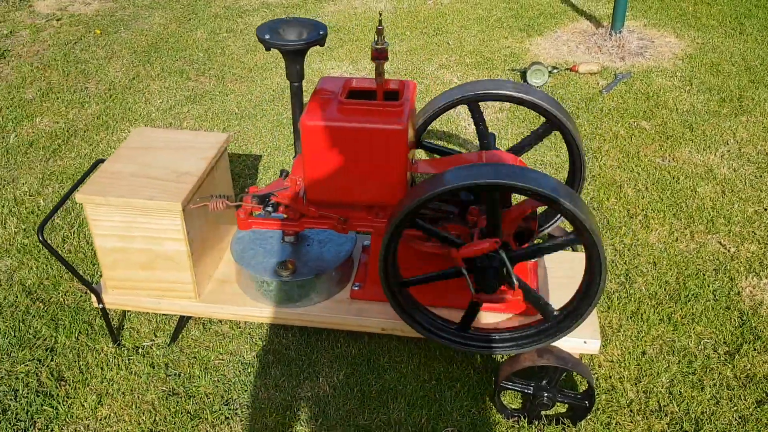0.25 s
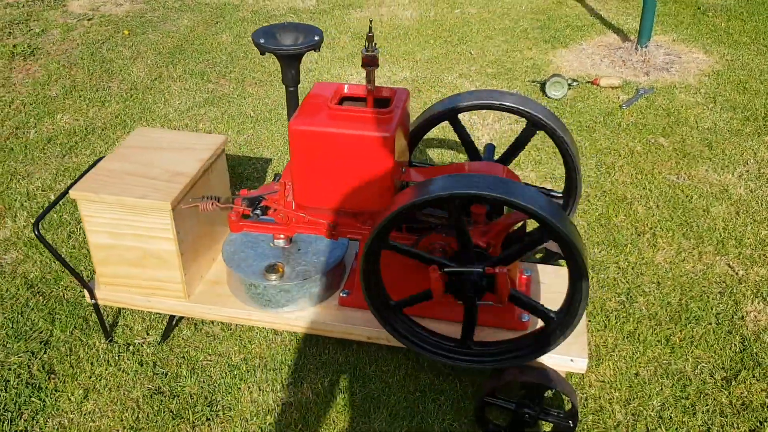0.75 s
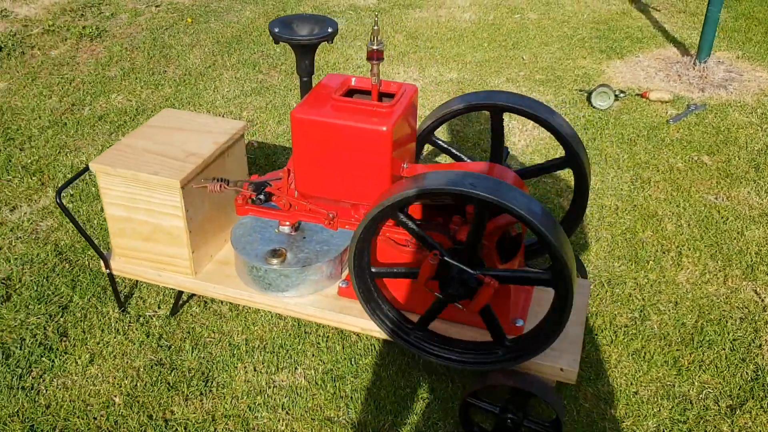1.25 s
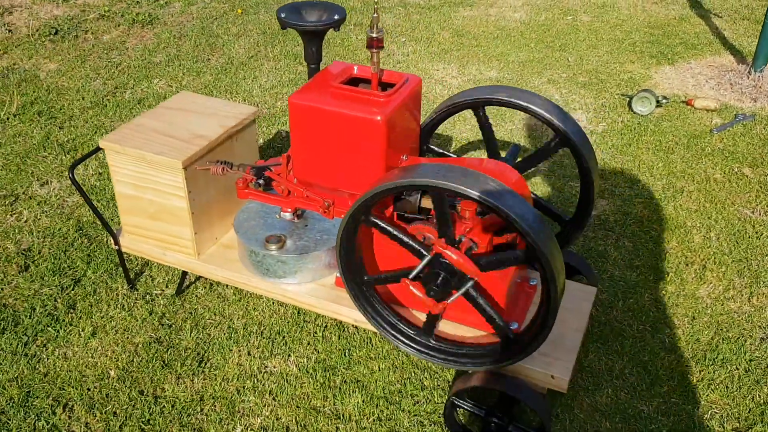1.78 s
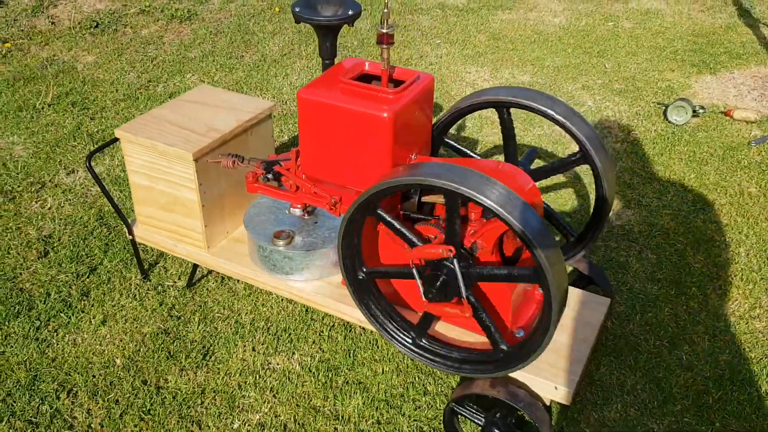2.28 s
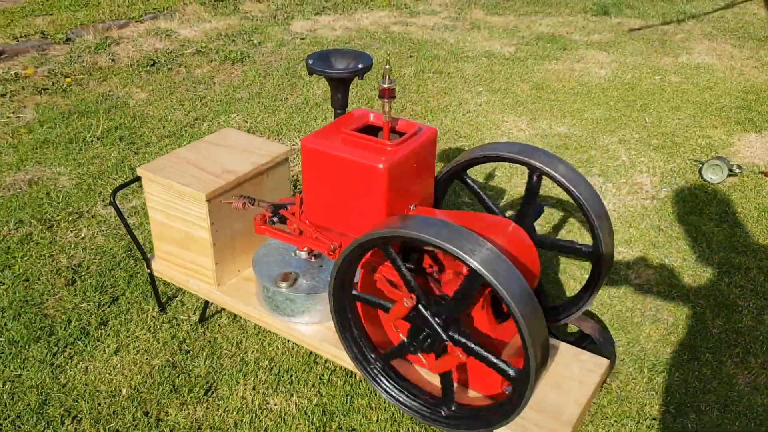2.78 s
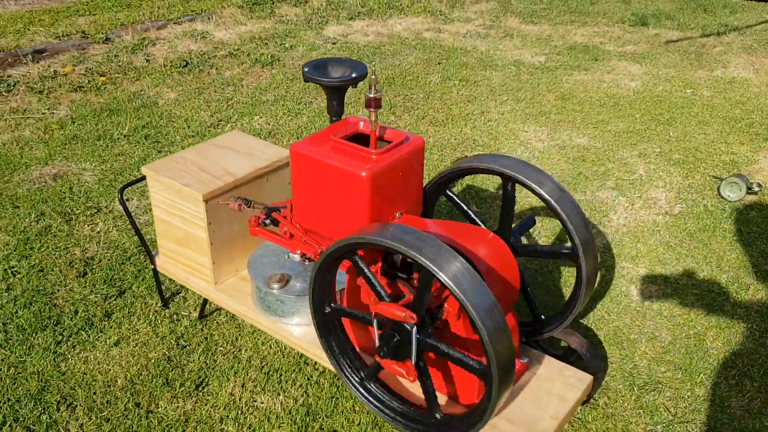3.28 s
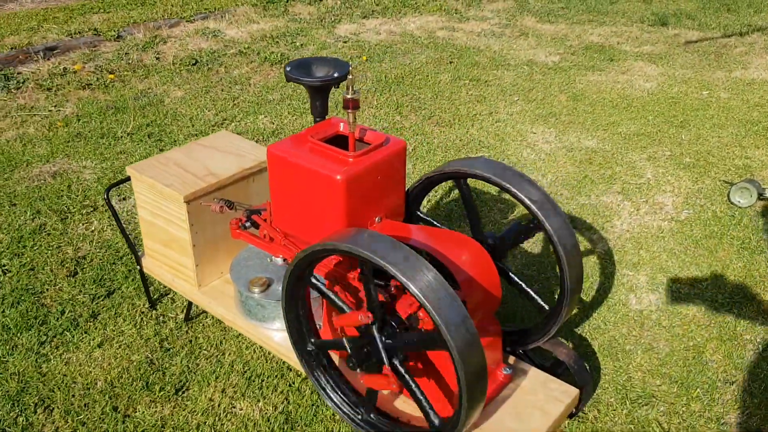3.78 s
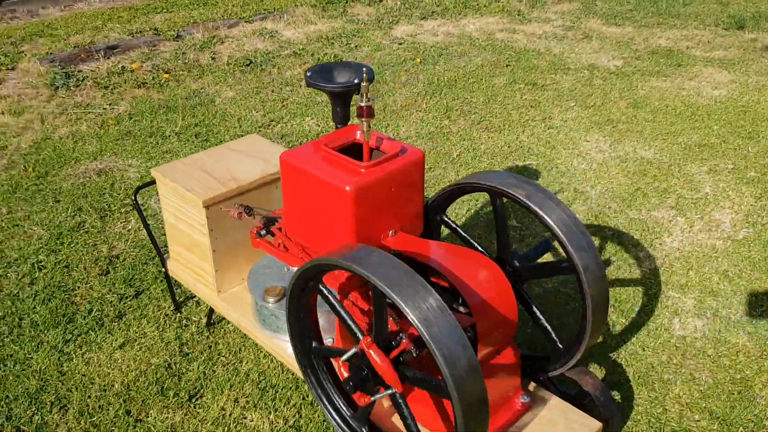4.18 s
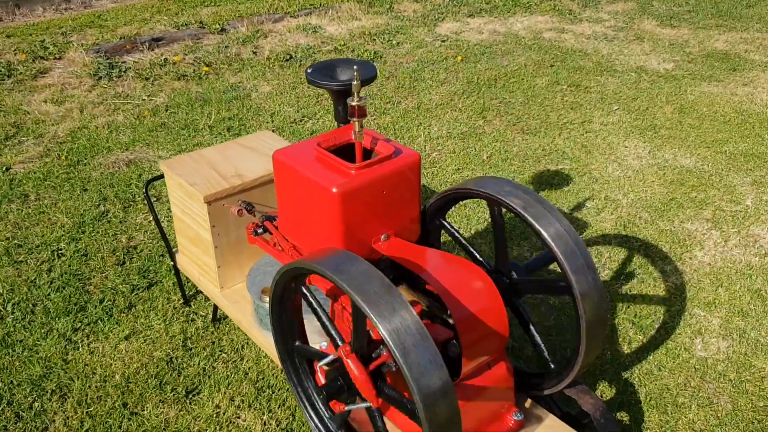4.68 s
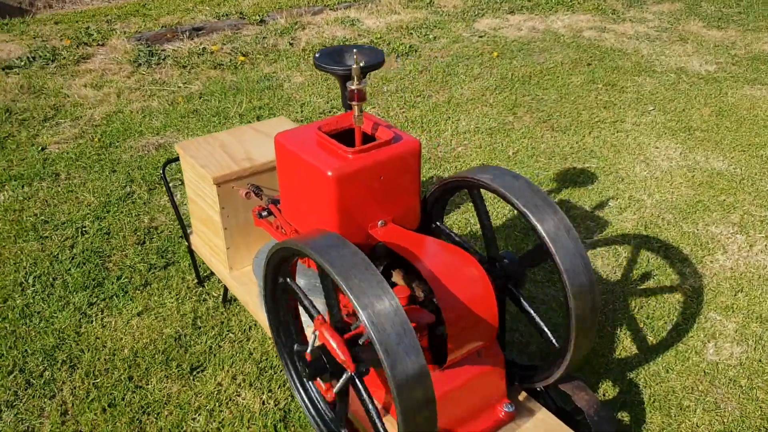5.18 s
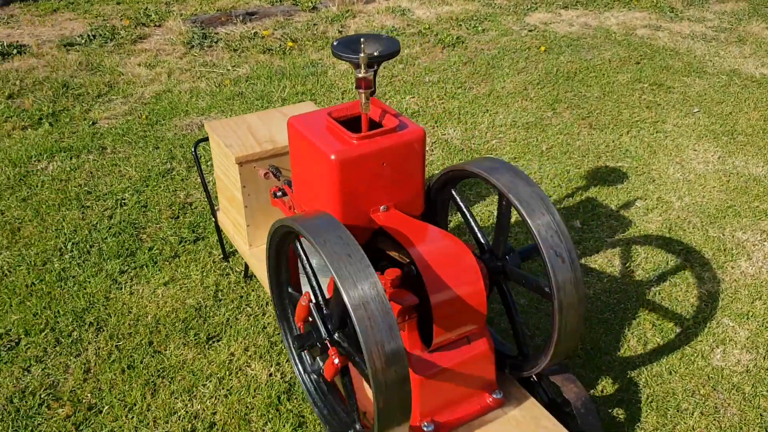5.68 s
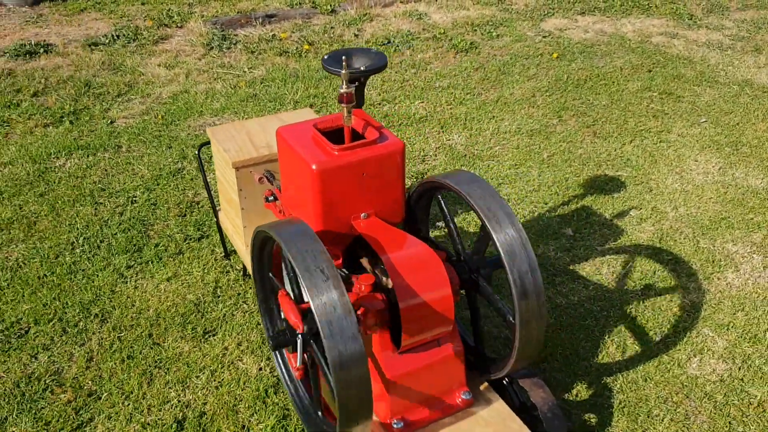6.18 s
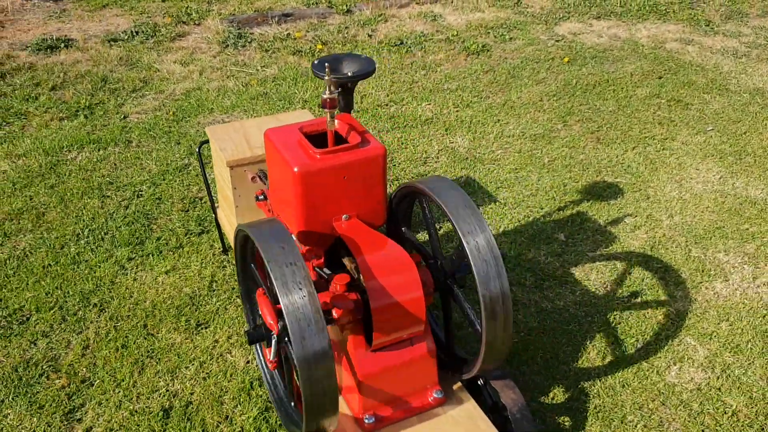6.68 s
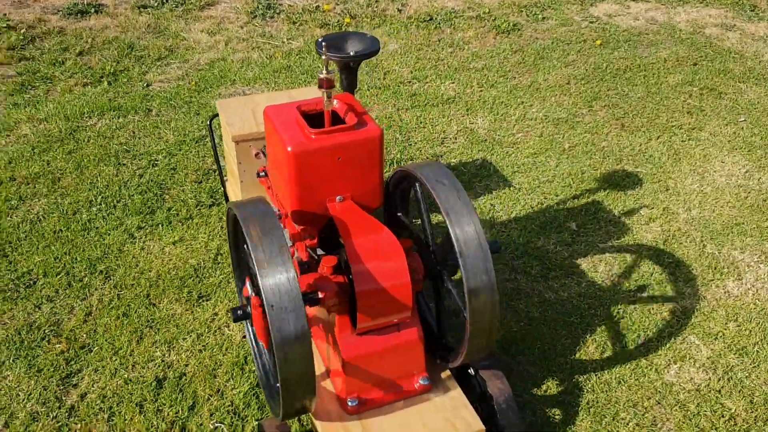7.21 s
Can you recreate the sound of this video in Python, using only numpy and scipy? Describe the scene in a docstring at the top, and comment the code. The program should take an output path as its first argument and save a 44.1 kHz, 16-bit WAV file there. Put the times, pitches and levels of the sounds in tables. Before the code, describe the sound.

A small old single-cylinder engine with heavy flywheels runs on a wooden cart on a lawn, heard a step away in dry open-air stereo for about 7.4 seconds. It is already turning. Nearly three times a second the mechanism repeats an uneven pattern: a light lift tick, a bright iron clank, dull knocks through frame and boards, a short swelling valve hiss cut off, and a latch click with loose chatter. At about 1.3, 2.7, 4.4 and 6.1 seconds it fires: a thin clank, a blunt crack, then within hundredths of a second a much louder metallic clank and a rough exhaust puff dying quickly. The crack at 4.4 is strongest. Between firings it coasts, clattering. Faint grainy gear rumble and thin whirr lie underneath, swelling around each firing. Soft low air pushes and slight wind bumps appear, most around 6.1 and 7.2. The clatter continues to the end.

```python
"""Knocks, clanks, ticks and puffs of a small single-cylinder engine on a wooden cart on a lawn, a step away.
Cam, push rod, latch and valve ring the iron and boards (decaying modes, noise bursts); the piston pumps
air through the open valve (swelling hiss). Every few turns a charge fires: crack, clank, exhaust blast.
Gears and bearings rumble and whirr beneath; some wind brushes the microphone (low noise)."""
import sys
import numpy as np
from scipy import signal
from scipy.fft import rfft, irfft, next_fast_len
from scipy.io import wavfile
from scipy.ndimage import map_coordinates

SR = 44100
rng = np.random.default_rng(int(sys.argv[2]) if len(sys.argv) > 2 else 0)


def inscribe(sig):
    """Save sig as 16-bit PCM at rate SR to the path in sys.argv[1].

    A 1-D sig is mono; a 2-D sig holds one channel per row.
    Samples are clipped to [-1, 1] before scaling.
    """
    pcm = np.round(np.clip(np.atleast_2d(sig).T, -1, 1) * 32767)
    wavfile.write(sys.argv[1], SR, pcm.astype(np.int16))


N = 328533

# colour of valve air and whirr: f/Hz, relative density level/dB
AIR_COLOUR = [(880, -49), (1500, -36), (1980, -38), (2150, -53), (2650, -54), (2930, -4.5), (3960, -0.5),
              (4880, -6.5), (6860, 1.5), (8800, -10.5), (12900, 1), (15900, -5.5), (16400, -6.5)]
# colour of gear rumble and board rattle: f/Hz, relative density level/dB
RUMBLE_COLOUR = [(71, -67), (120, -19), (399, -4), (520, 1.5), (711, -5.5), (844, 0), (1000, -1.5),
                 (1370, -5.5), (1840, -12), (2290, -8.5), (2520, -11), (3330, -16), (5000, -19),
                 (6500, -24), (11000, -120)]
# colour of air pushes and wind: f/Hz, relative density level/dB
THUMP_COLOUR = [(12, -51), (20, -26), (70, -3.5), (155, -5), (197, -19.5), (280, -3), (300, -1), (390, -20),
                (660, -120)]
# turns of the cam: lift t/s, clank t/s, second knock t/s; relative level/dB of each part, lift to push
# as in PARTS; favoured f/Hz of the clanks, of the knocks
TURNS = [(-.018, 0.045, .172, -30, -17, -14, -19.5, -26.5, -26, -23.5, -30, -39.5, -56, 2200, 765),
         (.324, .385, .520, -21.5, -26.5, -16.5, -21, -28.5, -25.5, -23, -29, -39.5, -56, 2020, 1060),
         (.678, 0.7423, .8862, -22.5, -28, -16.5, -21.5, -24, -20, -19, -22, -31.5, -56, 2040, 807),
         (1.053, 1.12, 1.275, -15.5, -17.5, -10, -13, -15.5, -14.5, -16, -70, -25.5, -48, 2040, 770),
         (1.422, 1.481, 1.600, -15.5, -23, -12, -22, -26.5, -24.5, -23.5, -26.5, -36.5, -53, 2780, 700),
         (1.748, 1.808, 1.935, -21, -33, -18.5, -24, -28, -25.5, -25, -29.5, -37, -56, 2080, 534),
         (2.086, 2.148, 2.285, -22.5, -32, -19, -26, -28, -25, -24.5, -33, -35.5, -61, 2900, 794),
         (2.446, 2.510, 2.657, -29, -37, -14.5, -23, -23.5, -22, -17.5, -70, -28, -55, 1910, 900),
         (2.791, 2.856, 2.965, -19, -16.5, -13, -20, -29, -24, -24, -26.5, -37, -50, 2050, 810),
         (3.105, 3.168, 3.285, -20.5, -27, -18, -26.5, -30.5, -27.5, -23.5, -27.5, -34, -59, 3060, 553),
         (3.432, 3.494, 3.620, -21, -35, -22, -25, -28, -28, -24, -30.5, -35.5, -57, 2080, 520),
         (3.773, 3.836, 3.972, -23.5, -24, -22, -23, -31, -24, -19.5, -23.5, -29, -57, 1900, 655),
         (4.135, 4.198, 4.344, -14.5, -23, -6, -11.5, -16, -19, -15, -70, -20.5, -49, 2210, 526),
         (4.488, 4.548, 4.664, -19, -15.5, -11, -14.5, -27, -21, -22, -26.5, -29.5, -49, 2340, 850),
         (4.809, 4.868, 4.993, -19.5, -20, -23.5, -21.5, -24.5, -25, -22, -28.5, -33, -58, 2240, 520),
         (5.145, 5.21, 5.339, -21, -22, -17.5, -22, -26, -23.5, -22, -29.5, -35, -53, 2260, 848),
         (5.499, 5.565, 5.705, -22.5, -24.5, -16, -16.5, -25, -20.5, -17.5, -23.5, -30, -55, 2240, 850),
         (5.872, 5.938, 6.092, -14.5, -24, -14.5, -14, -16, -17.5, -13.5, -70, -23.5, -51, 2430, 844),
         (6.240, 6.299, 6.421, -19.5, -20.5, -14, -13.5, -22.5, -24.5, -19.5, -26.5, -32, -48, 2327, 920),
         (6.565, 6.628, 6.755, -20, -25, -17, -19.5, -23, -24, -21, -26.5, -34, -51, 2320, 790),
         (6.91, 6.973, 7.111, -22.5, -38, -18.5, -20.5, -27, -24, -20, -30, -33.5, -48, 2250, 830),
         (7.267, 7.337, 7.486, -22, -29, -20.5, -23, -21, -21.5, -25, -70, -24, -59, 2500, 830)]
PARTS = "lift rod clank spit rebound first second trip stroke push clank_hz knock_hz".split()
# cam position of each part: part, turns after the clank
PLACES = dict(lift=-.18, rod=-.09, clank=0, spit=0, push=0, rebound=.057, first=.2, stroke=.342, second=.37, trip=.57)
# fired charges: crack t/s, clank t/s; relative level/dB of crack, clank, blast, push, shaking
FIRINGS = [(1.31, 1.341, -14.5, -3, -13, -46, -25.5), (2.688, 2.7177, -14, -6, -12.5, -44, -33.5),
           (4.379, 4.4093, -10.5, -2.5, -12, -42, -25), (6.129, 6.162, -13.5, -2.5, -12, -43, -25)]
# exhaust puffs: t/s after the clank, level/dB re blast, rise/s, hold/s, t60/s
PUFFS = [(0.018, -0.9, .0045, 0.015, 0.066), (0.041, -12, 0.0026, 0.0055, 0.21)]


def amp(db):
    """dB to gain."""
    return 10 ** (np.asarray(db) / 20)


def rms_one(x):
    """Scale to rms 1."""
    return x / np.sqrt(np.mean(x ** 2) + 1e-20)


def in_time(rows):
    """Interpolate each column of a curve, first column t/s, to every sample."""
    s, *columns = np.transpose(rows)
    return [np.interp(np.arange(N) / SR, s, column) for column in columns]


def drift(rate_hz):
    """Random wander, rms 1: white noise at SR/40 through a two-pole low-pass."""
    step, settle = 40, 2000
    r = np.exp(-2 * np.pi * rate_hz * step / SR)
    white = rng.standard_normal(N // step + settle + 2)
    slow = signal.lfilter([1], [1, -2 * r, r * r], white)[settle:]
    return np.interp(np.arange(N) / step, np.arange(len(slow)), rms_one(slow))


def noise(colour, channels=1):
    """Gaussian noise shaped by a spectrum, dB linear in log f; rms 1 over all channels."""
    size = next_fast_len(N)
    hz = np.maximum(np.arange(size // 2 + 1) * SR / size, 1)
    colour_hz, colour_db = np.array(colour).T
    gain = amp(np.interp(np.log(hz), np.log(colour_hz), colour_db))
    white = rng.standard_normal((channels, size))
    return rms_one(irfft(rfft(white) * gain, size)[:, :N])


def highpass(x, order, hz):
    """Butterworth high-pass."""
    return signal.sosfilt(signal.butter(order, hz, "high", fs=SR, output="sos"), x)


def add(out, s, piece):
    """Mix a piece in at time s, no earlier than 0."""
    i = max(round(s * SR), 0)
    out[i:i + len(piece)] += piece[:max(N - i, 0)]


def bell(t, centre_s, sigma_s):
    """Gaussian swell."""
    return np.exp(-.5 * ((t - centre_s) / sigma_s) ** 2)


def cam():
    """Known cam positions in turns, and their times in s."""
    known = [PLACES[part] for part in ("lift", "clank", "second")]
    turn = np.add.outer(np.arange(len(TURNS)), known)
    return turn.ravel(), np.array(TURNS)[:, :3].ravel()


def every_turn(part, late_s=0):
    """Rows (t/s, part level/dB, clank f/Hz, knock f/Hz), one per turn, t > 0 only."""
    column = dict(zip(PARTS, np.array(TURNS).T[3:]))
    s = np.interp(np.arange(len(TURNS)) + PLACES[part], *cam()) + late_s
    rows = zip(s, column[part], column["clank_hz"], column["knock_hz"])
    return [row for row in rows if row[0] > 0]


def struck(modes, favoured_hz, contact_s, chance, t):
    """One blow: decaying modes of random strength, tuning and phase, favoured near one pitch; peak 1."""
    hz, db, t60 = np.array(modes).T[:, :, None]
    near_db = -6 * np.abs(np.log2(hz / favoured_hz))  # 6 dB/octave away from the favoured pitch
    own_db, own_hz, own_turn = 2.5 * chance[0], hz * (1 + 0.011 * chance[1]), .2 * chance[2]
    sines = np.sin(2 * np.pi * (own_hz * t + own_turn))
    blow = np.sum(amp(db + near_db + own_db - 60 * t / t60) * sines, axis=0)
    blow *= 1 - np.exp(-(t / contact_s) ** 2)  # builds up over the contact
    return blow / np.abs(blow).max()


def wind():
    """Gusts: low noise, independent in each channel, under one shared flickering level."""
    # gust curve: t/s, relative level/dB
    gusts = [(0.0, -73), (0.62, -80), (0.91, -64), (2.09, -75), (2.66, -70), (3.09, -74), (4.13, -69),
             (4.38, -56), (4.62, -60), (4.95, -64), (5.35, -70), (5.79, -66), (6.1, -47.5), (6.27, -47.5),
             (6.91, -61), (7.16, -46), (7.45, -63)]
    level = amp(in_time(gusts)[0] + 2.5 + 2.7 * drift(4.5))
    return level * noise(THUMP_COLOUR, channels=2)


def shaken(steady_db, swell_db, after_s, over_db, rise_db_per_s, fall_db_per_s):
    """Gain with one swell per turn, power-summed with a rise to and fall from each firing."""
    beat_turn = -0.12  # swell tops here
    t, (turn, s) = np.arange(N) / SR, cam()
    beat = np.cos(2 * np.pi * (np.interp(t, s, turn) - beat_turn))
    gain = amp(steady_db + swell_db * beat)
    for _, clank_s, *_, shake_db in FIRINGS:
        late_s = t - clank_s - after_s
        ramp_db = np.minimum(rise_db_per_s * late_s, -fall_db_per_s * late_s)
        gain = np.hypot(gain, amp(shake_db + over_db + ramp_db))
    return gain


def running():
    """Gear teeth tap the body many times a second over bearing noise, with a thin whirr above."""
    # gears and bearings: t/s, relative rumble level/dB, relative whirr level/dB
    running_levels = [(0.0, -35, -43), (.5, -40, -50.5), (2.3, -38.5, -50.5), (3.7, -40, -47.5),
                      (4.8, -36, -47), (5.5, -40, -46.5), (6.7, -35.5, -48.5), (7.45, -38.5, -43)]
    rumble_db, whirr_db = in_time(running_levels)
    taps = (rng.random(N) < 450 / SR) * amp(1.2 * rng.standard_normal(N))  # mean 450 taps/s
    tap_decay_s = 0.0036
    grain = rms_one(signal.lfilter([1], [1, -np.exp(-1 / (tap_decay_s * SR))], taps))
    rumble_gain = shaken(rumble_db, swell_db=3.5, after_s=0, over_db=-0.5,
                         rise_db_per_s=24.5, fall_db_per_s=65)
    whirr_gain = shaken(whirr_db, swell_db=1.7, after_s=0.06, over_db=0,
                        rise_db_per_s=55, fall_db_per_s=145)
    rumble = rumble_gain * amp(-9 + 1.5 * drift(25)) * (.6 + grain) * noise(RUMBLE_COLOUR)[0]
    whirr = whirr_gain * amp(-4 + 3.0 * drift(54)) * noise(AIR_COLOUR)[0]
    return rumble + whirr


def pushes():
    """Each piston stroke and first exhaust puff moves a soft lump of air, uneven between channels."""
    level, t = np.zeros(N), np.arange(N) / SR
    times = [(s, db) for s, db, *_ in every_turn("push")]
    times += [(clank_s + PUFFS[0][0], db) for _, clank_s, *_, db, _ in FIRINGS]
    for s, db in times:
        level += amp(db) * bell(t, s, 0.043)
    return level * (noise(THUMP_COLOUR) + 0.35 * noise(THUMP_COLOUR, channels=2))


def strokes():
    """Valve hiss swells while the piston speeds up and is cut as the stroke ends."""
    rise_s, fall_s = 0.016, 0.01  # Gaussian sigmas
    level, t = np.zeros(N), np.arange(N) / SR
    for s, db, *_ in every_turn("stroke"):
        level += amp(db) * bell(t, s, np.where(t < s, rise_s, fall_s))
    return level * amp(1.5 * drift(80)) * noise(AIR_COLOUR)[0]


def tick_times():
    """Rows (t/s, relative level/dB, t60/s): parts of every turn, and a spit after each crack."""
    # ticks and spits: part, delay/s, level/dB re part, t60/s
    tick_places = [("lift", .006, 0.1, 0.2), ("rod", .001, -7, 0.12), ("spit", -0.00084, 0.1, 0.1),
                   ("rebound", 0.00044, -3.5, 0.058), ("rebound", 0.0239, -4, 0.027),
                   ("trip", -0.0344, -3.5, 0.051), ("trip", 0.00084, -0.65, .1), ("trip", .015, 0.1, 0.076)]
    rows = []
    for part, late_s, over_db, t60 in tick_places:
        rows += [(s, db + over_db, t60) for s, db, *_ in every_turn(part, late_s)]
    return rows + [(crack_s + 0.018, db + 0.8, .1) for crack_s, _, db, *_ in FIRINGS]


def ticks():
    """Bright noise spits with a rounded top and a fainter decaying tail, grainy within."""
    # tick colour: f/Hz, relative density level/dB
    tick_colour = [(1760, -9.5), (3000, 2), (3870, -5), (5220, -1.5), (5850, -5), (7080, -2.5), (8280, -26),
                   (9270, -6.5), (12900, -6.5), (15700, -10), (16400, -6)]
    level, t = np.zeros(N), np.arange(SR // 4) / SR
    spit = bell(t, .005, 0.0015)
    for s, db, t60 in tick_times():
        tail = amp(-60 * t / t60) * (1 - np.exp(-(t / 0.0045) ** 2))
        add(level, s - .002, amp(db - 10) * (spit + tail))
    return level * amp(3.6 * drift(225)) * noise(tick_colour)[0]


def clank_times():
    """Rows (t/s, relative level/dB, favoured f/Hz, clatter t60/s): parts of every turn, and firings."""
    # clanks: part, delay/s, level/dB re part, pitch ratio to the turn's, clatter t60/s
    clank_places = [("lift", 0.001165, -5, 2, 0.14), ("rod", .0001, 0.1, 0.71, 0.073),
                    ("clank", .0002, 0.2, 0.8, 0.08), ("rebound", 0.022, -7, 1.9, .035),
                    ("second", 0.00103, -11, 1.2, 0.022), ("trip", 0.001014, 0.1, 1.17, .075)]
    rows = []
    for part, late_s, over_db, ratio, length_s in clank_places:
        rows += [(s, db + over_db, hz * ratio, length_s) for s, db, hz, _ in every_turn(part, late_s)]
    for crack_s, clank_s, _, db, *_ in FIRINGS:
        rows.append((crack_s - .039, db - 13.5, 3160, 0.058))  # thin clank ahead of the crack
        rows.append((clank_s, db, 2080, 0.058))
    return rows


def clanks():
    """Each contact rings rod and valve; loose parts chatter after it as dense taps on the same iron."""
    # rod and valve modes: f/Hz, relative level/dB, t60/s of the ring
    high_modes = [(1714, -13.5, 0.051), (1908, 0, 0.032), (2041, 0, 0.023), (2308, -6, 0.078),
                  (2377, -3, 0.074), (2834, -14.5, 0.14), (3012, -12.5, 0.067), (3300, 0.5, 0.028),
                  (3320, -5, 0.052), (3834, 15, 0.0074)]
    # clatter colour: f/Hz, relative density level/dB
    clatter_colour = [(710, -71), (1200, -4.5), (1510, 4.5), (1840, 4.5), (2310, 9), (2550, 4), (3010, -1),
                      (3450, -29), (5000, -76), (6500, -52), (11000, -120)]
    ring, clatter, t = np.zeros(N), np.zeros(N), np.arange(SR // 5) / SR
    blows = clank_times()
    chances = rng.standard_normal((len(blows), 3, len(high_modes), 1))
    for (s, db, hz, length_s), chance in zip(blows, chances):
        add(ring, s - .002, amp(db - 2.5) * struck(high_modes, hz, .0035, chance, t))
        add(clatter, s, amp(db - 60 * t / length_s) * (1 - np.exp(-t / 0.006)))
    taps, chatter = clatter * (rng.random(N) < 600 / SR), 0  # mean 600 taps/s
    for hz, db, t60 in high_modes:
        r, w = amp(-60 / (0.21 * t60 * SR)), 2 * np.pi * hz / SR  # chatter rings shorter
        hits = taps * amp(db - 17) * rng.standard_normal(N) + 1e-18
        chatter = chatter + signal.lfilter([0, np.sin(w)], [1, -2 * r * np.cos(w), r * r], hits)
    return ring + chatter + amp(-5) * clatter * noise(clatter_colour)[0]


def knock_times():
    """Rows (t/s, relative level/dB, favoured f/Hz): parts of every turn, and firings."""
    # dull knocks: part, delay/s, level/dB re part, pitch ratio to the turn's
    knock_places = [("lift", .0001, -5, 1.3), ("rod", .0001, -7.5, 0.97), ("clank", .001, -11.5, 1),
                    ("rebound", .0001, 0.1, 0.8), ("first", .0001, 0.1, 0.96), ("second", .0001, 0.1, 0.83),
                    ("trip", 0.00104, -6, 1.34)]
    rows = []
    for part, late_s, over_db, ratio in knock_places:
        rows += [(s, db + over_db, hz * ratio) for s, db, _, hz in every_turn(part, late_s)]
    for crack_s, clank_s, crack_db, clank_db, *_ in FIRINGS:
        rows.append((crack_s, crack_db + 0.5, 560))  # frame thump
        rows.append((clank_s, clank_db - 7.5, 1510))
    return rows


def knocks():
    """Each contact rings frame and boards, then a short rattle; ring high-passed at 280 Hz."""
    # frame and board modes: f/Hz, relative level/dB, t60/s
    low_modes = [(317, -7, 0.059), (490, -8.5, 0.083), (541, -7, 0.09), (596, 2, 0.032),
                 (808.7, -2.5, 0.046), (854.6, -0.5, 0.065), (1106, -1.5, 0.037), (1185, -3, 0.077),
                 (1311, -3, 0.067), (1471, 15, 0.012)]
    ring, rattle, t = np.zeros(N), np.zeros(N), np.arange(SR // 8) / SR
    blows = knock_times()
    chances = rng.standard_normal((len(blows), 3, len(low_modes), 1))
    for (s, db, hz), chance in zip(blows, chances):
        add(ring, s - .001, amp(db + 1.5) * struck(low_modes, hz, .0018, chance, t))
        add(rattle, s + 0.004, amp(db - 11.5 - 60 * t / 0.073))
    return highpass(ring, 2, 280) + rattle * noise(RUMBLE_COLOUR)[0]


def firings():
    """A blunt crack, then two exhaust puffs as the valve lifts: the jet swells, holds, flutters out."""
    # blast colour: f/Hz, relative density level/dB
    blast_colour = [(120, -46), (200, -24), (503, -40), (700, 0.5), (890, -22), (1050, -32), (1550, -1.5),
                    (1790, -19.5), (2640, 0), (3000, -8), (6630, -1), (8430, -14), (14100, -1.5),
                    (15500, -11), (16400, -31)]
    crack_hold_s, crack_t60_s = 0.0043, 0.005
    level, t = np.zeros(N), np.arange(SR // 3) / SR
    for crack_s, clank_s, crack_db, _, blast_db, *_ in FIRINGS:
        add(level, crack_s, amp(crack_db - 60 * np.maximum(t - crack_hold_s, 0) / crack_t60_s))
        for after_s, over_db, rise_s, hold_s, t60 in PUFFS:
            fade = amp(blast_db + over_db - 60 * np.maximum(t - hold_s, 0) / t60)
            add(level, clank_s + after_s, fade * (1 - np.exp(-(t / rise_s) ** 2)))
    return level * amp(1.2 * drift(200)) * noise(blast_colour)[0]


def two_ears(x):
    """Direct sound with a wandering delay between channels, plus echoes that differ by side."""
    # ground and cart echoes: left delay t/s, right delay t/s, level/dB
    echoes = [(.00071, 0.001082, -13.5), (.00192, 0.00288, -11.5), (.0041, 0.003, -11),
              (.0052, .0061, -16.5), (.0095, 0.0073, -15)]
    lag, at = .00004 * SR * drift(9.6), np.arange(N)  # 40 us rms, in samples
    out = np.array([map_coordinates(x, [at + side * lag / 2], order=3, mode="nearest")
                    for side in (-1, 1)])
    bright = highpass(x, 1, 1920)  # echoes kept bright: the channels differ mostly in the treble
    for left_s, right_s, db in echoes:
        add(out[0], left_s, amp(db) * bright)
        add(out[1], right_s, amp(db) * bright)
    return out


def scene():
    """Engine in both channels with echoes, air pushes and wind; right 0.4 dB over left."""
    engine = running() + strokes() + ticks() + clanks() + knocks() + firings()
    return (wind() + pushes() + two_ears(engine)) * amp([[-.2], [.2]])


def record(dry):
    """Thin the deepest bass, clip the peaks, cut the top."""
    clipped = np.clip(highpass(dry, 2, 32), -.92, .92)
    top_cut = signal.cheby2(16, 69, 16500, fs=SR, output="sos")  # 69 dB down from 16.5 kHz
    return signal.sosfilt(top_cut, clipped)


dry = scene()
out = record(dry)
inscribe(out)
```